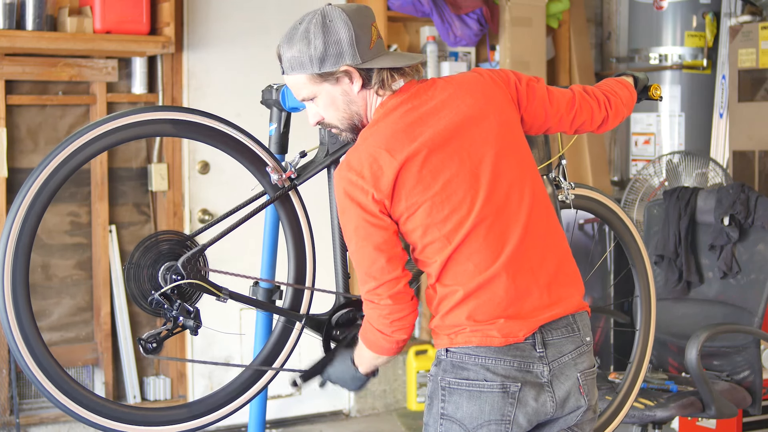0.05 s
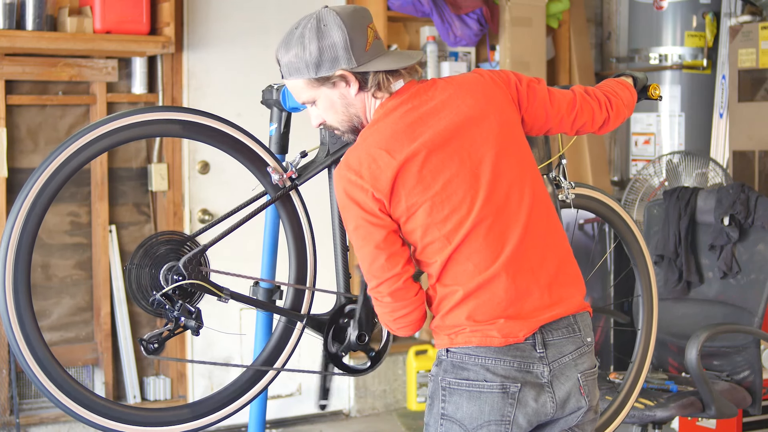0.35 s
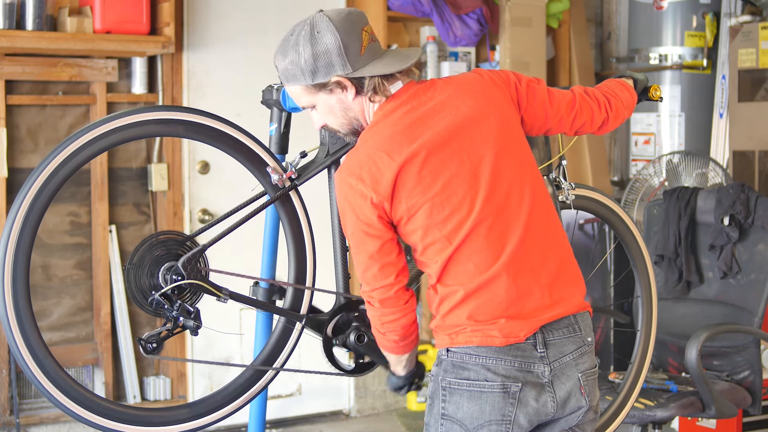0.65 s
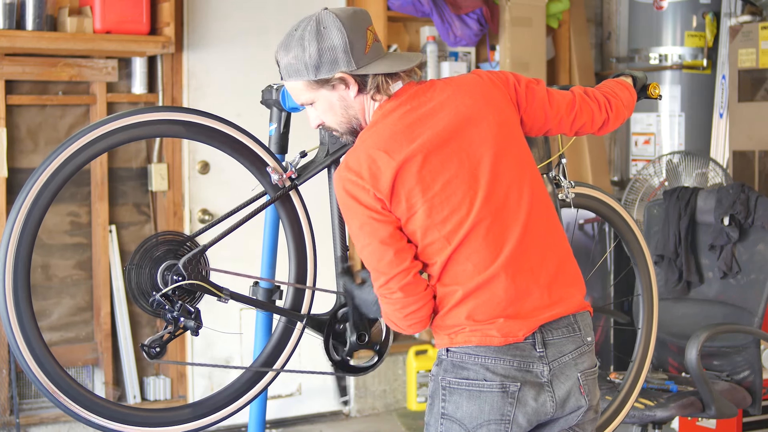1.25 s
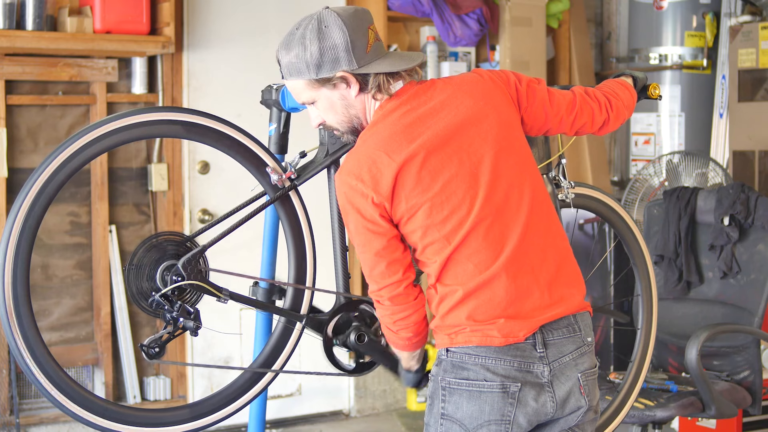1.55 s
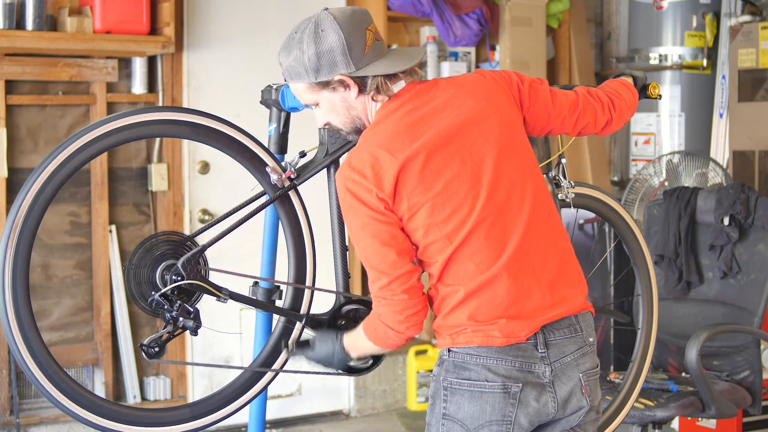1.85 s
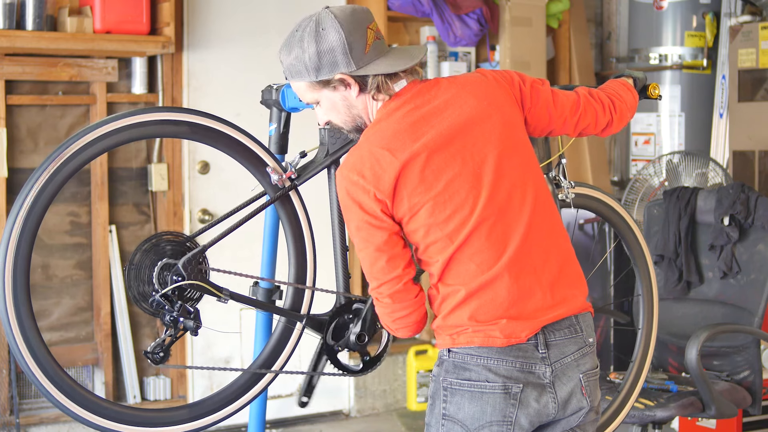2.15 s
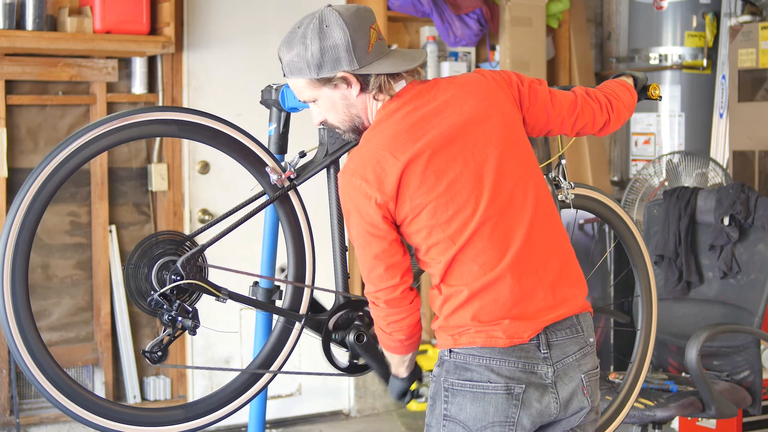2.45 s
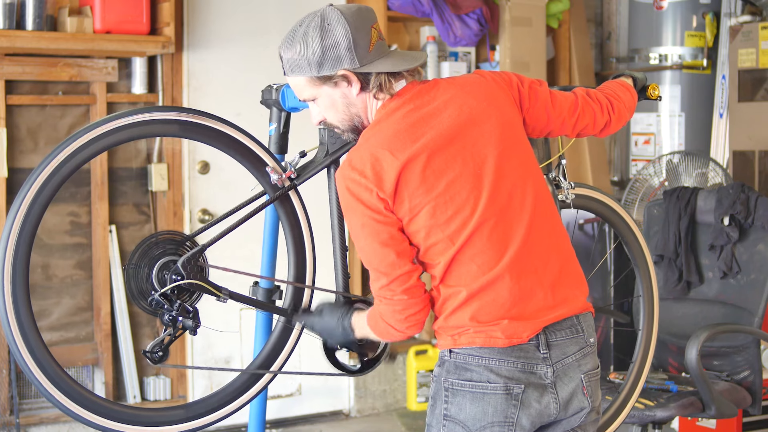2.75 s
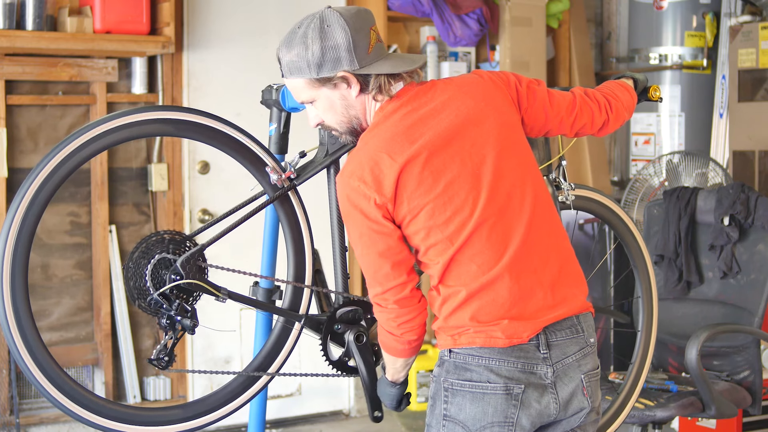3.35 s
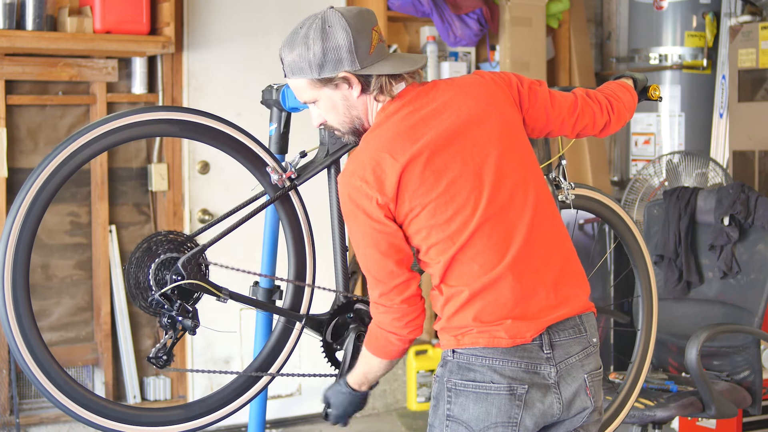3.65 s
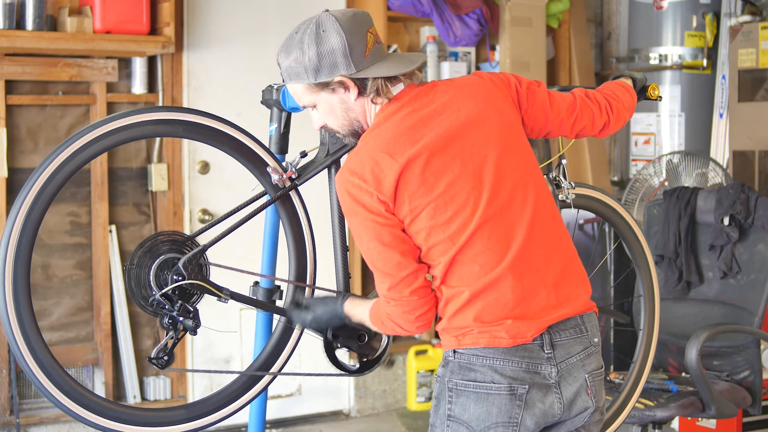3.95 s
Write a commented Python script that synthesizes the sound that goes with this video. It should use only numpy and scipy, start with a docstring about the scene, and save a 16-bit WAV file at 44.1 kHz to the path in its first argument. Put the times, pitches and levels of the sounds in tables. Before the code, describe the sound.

A hand-cranked bicycle chain whirs over its gears, with clacks and a ticking freehub.

```python
"""A bicycle chain purrs link by link over its sprockets, close to a stereo pair in a small workshop.
The bicycle hangs in a repair stand and its crank is turned by hand. The chain clacks through a gear
change, and whenever the hand lags behind the wheel the freehub pawls tick or buzz.
At the end the wheel coasts and something thumps. Behind it all lie room air and a faint hum."""
import sys
import numpy as np
from scipy import signal
from scipy.fft import rfft, irfft
from scipy.io import wavfile
from scipy.ndimage import uniform_filter1d

SR = 44100
rng = np.random.default_rng(int(sys.argv[2]) if len(sys.argv) > 2 else 0)


def master_out(mix):
    """Clip the mix to full scale and print it as 16-bit PCM to the path in sys.argv[1]."""
    frames = np.transpose(np.atleast_2d(mix))
    ceiling = np.clip(frames, -1, 1)
    pcm = np.round(ceiling * 32767).astype(np.int16)
    wavfile.write(sys.argv[1], SR, pcm)


N = 176400
TIME, FREQ = np.arange(N) / SR, np.fft.rfftfreq(2 * N, 1 / SR)
RISE_S = .0018  # attack of every blow and ring

# chain speed (t/s, link rate/Hz)
LINK_RATE = [(0, 48.2), (.8, 48.2), (1.4, 54), (2.6, 62), (3.1, 42), (3.35, 15), (4, 20)]
# loudness of the link clicks (t/s, level/dB)
CLICK_LEVEL = [(0, -39), (.8, -38.5), (1.7, -39), (2.66, -37.5), (3.15, -36.5)]
# spectrum of a link click (f/Hz, level/dB)
CLICK_COLOUR = [(300, -40), (1800, -6), (2700, -4.5), (5200, 1), (7500, -2), (9300, 6.5), (10500, 1),
                (12500, -1), (14000, -6.5), (16000, -12)]
# resonances of the frame (f/Hz, width/Hz, level over the colour/dB)
FRAME_MODES = [(236, 14, 1), (370, 11, 4), (461, 69, 0.5), (555, 12, -2), (656, 22, 2), (839, 42, 5.5)]


def chain(jitter_s=.0018, spread_db=8.5, rubbing=.53):
    """Links seat on the teeth. Returns their bright clicks, and the frame's rumble and hollow drone."""
    # loudness of the rumble and of the drone (t/s, level/dB)
    rumble_level = [(0, -49.5), (.55, -49), (.9, -46), (3, -47.5), (3.2, -40), (3.36, -48.5), (3.58, -53.5),
                    (3.63, -42.5), (4, -44)]
    drone_level = [(.2, -56.5), (.45, -52), (1.6, -60.5), (3.4, -57.5)]
    # their spectra (f/Hz, level/dB)
    rumble_colour = [(35, -18), (100, -6), (200, -16.5), (240, 0), (400, -4.5), (830, 1), (980, -8),
                     (1250, -0.5), (1520, 4), (1800, -12), (2700, 4.5), (5000, -9.5), (16000, -46)]
    drone_colour = [(180, -37), (330, -3.5), (470, 0), (800, -34.5)]
    times = teeth(LINK_RATE)
    late, size = rng.uniform(-1, 1, (len(times), 2)).T
    times = times + jitter_s * late
    db = spread_db * size - 1.5 * (np.arange(len(times)) % 2)  # every second link is softer
    seating = blows(times, db, decay_s=.0047) + rubbing
    shaking = blows(times, db, decay_s=.022)
    rumble = body(contact(shaking / shaking.mean()), rumble_colour, FRAME_MODES) * fader(rumble_level)
    clicks = body(contact(seating / seating.mean()), CLICK_COLOUR) * fader(CLICK_LEVEL)
    drone = body(contact(shaking / shaking.mean()), drone_colour, FRAME_MODES) * fader(drone_level)
    return clicks, rumble + drone


def freehub(spread_db=2, jitter_s=.00083, second_lag_s=.0074, second_db=-6.5):
    """Two pawls snap over the ratchet, not quite together, and ring the hub; fast clicks buzz."""
    # ratchet speed, a curve for each lag of the hand and one for the coast (t/s, click rate/Hz)
    slips = [
        [(1.002, 30.8), (1.07, 86.8), (1.17, 103.7), (1.24, 54.5), (1.275, 22.9), (1.39, 27.2)],
        [(2.072, 39.5), (2.16, 107.2), (2.26, 118.0), (2.38, 79.8), (2.45, 37.9), (2.55, 12.0)],
        [(2.706, 20.3), (2.79, 40.6), (2.99, 43.0), (3.08, 26.6), (3.2, 24.3)],
    ]
    coast = [(3.21, 85.6), (3.27, 112), (3.4, 188), (3.68, 207.7), (3.88, 124), (4, 105.5)]
    # strength of the snaps (t/s, level/dB)
    pawl_level = [(1, -23.5), (1.3, -23), (1.36, -31.5), (2.07, -26), (2.26, -22), (2.95, -24), (3.16, -23),
                  (3.5, -21), (4, -23)]
    # spectrum of a snap (f/Hz, level/dB)
    pawl_colour = [(300, -41), (1200, -30.5), (2500, -14), (4000, -7), (8800, -0.5), (11000, -4),
                   (13000, -8.5), (14200, -15.5)]
    # resonances of the hub (f/Hz, width/Hz, level over the colour/dB)
    hub_modes = [(1523, 16, 18), (5460, 340, 4), (6270, 300, 3.5), (8970, 410, 9)]
    times = np.concatenate([teeth(slip) for slip in slips + [coast]])
    late, size, lag = rng.uniform(-1.4, 1, (SR, 3))[:len(times)].T
    db = np.interp(times, *np.transpose(pawl_level)) + spread_db * size
    times = times + jitter_s * late
    first = blows(times, db, decay_s=.0049)
    second = blows(times + second_lag_s * abs(lag), db + second_db, decay_s=.0049)
    snaps = body(contact(first + second), pawl_colour, hub_modes)
    return snaps + chimes(times, db - 11.5, low_hz=8360, high_hz=9650, decay_s=.0051, partials=4)


def clacks(clang_stretch=1.18):
    """The chain slaps the cogs: a sharp top and a slightly longer clang."""
    # chain slaps (t/s, top level/dB, clang level/dB, power decay of the top/s)
    slaps = [(.883, -15.5, -30, 0.0057), (.888, -10.5, -37, 0.0039), (0.902, -17.5, -27, 0.011),
             (.964, -18, -27.5, 0.012), (0.971, -23, -26, 0.0038), (1.518, -27.5, -40, 0.0077),
             (1.977, -27.5, -35, 0.0053), (2.138, -24.5, -34, 0.0095), (2.241, -20.5, -32, .011),
             (3.195, -22.5, -28, 0.0057), (3.73, -20, -28, 0.013)]
    # spectra of the top and the clang (f/Hz, level/dB)
    top_colour = [(500, -65), (2500, -11), (7500, -4.5), (9500, 1.5), (14000, -13.5), (16000, -21)]
    clang_colour = [(150, -52), (400, 0.5), (1700, 6), (4000, -1.5), (7000, 4.5), (16000, -4)]
    top = sum(blows(s, db, decay) for s, db, _, decay in slaps)
    clang = sum(blows(s, db, clang_stretch * decay) for s, _, db, decay in slaps)
    return body(contact(top), top_colour) + body(contact(clang), clang_colour)


def pings(width_hz=650):
    """Single links and cogs ring out when struck, each in a narrow band around one pitch."""
    # struck links and cogs (t/s, f/Hz, level/dB)
    strikes = [(0.436, 9100, -32.5), (0.975, 2510, -21), (1.887, 12050, -33), (1.977, 9250, -32),
               (2.246, 10000, -22), (2.251, 3250, -26.5), (3.197, 9540, -18), (3.199, 10500, -27),
               (3.198, 3260, -24.5)]
    out = np.zeros((2, N))
    for s, hz, db in strikes:
        pole = np.exp((2j * np.pi * hz - np.pi * width_hz) / SR)
        ring = signal.lfilter([1], np.poly([pole, pole]), rng.standard_normal((2, N))).real
        envelope = np.sqrt(np.maximum(blows(s, db, decay_s=.0053), 0))
        out += ring / ring.std() * envelope
    return out


def side_plates(tinkle_db=-1, spread_db=10, ring_db=3, click_db=-3):
    """Loose side plates tinkle as they seat; now and then a link lands hard, with a click."""
    # links that land hard (t/s, level/dB)
    hard_links = [(.042, -31.5), (.189, -30.5), (.272, -41), (.313, -31.5), (.437, -28.5), (.583, -33),
                  (.685, -39), (.727, -30), (0.797, -30), (.851, -27), (1.611, -30), (1.701, -29.5),
                  (1.792, -30), (1.886, -26), (2.49, -25.5), (3.108, -26)]
    hard_s, hard_db = np.transpose(hard_links)
    times = teeth(LINK_RATE)
    db = np.interp(times, *np.transpose(CLICK_LEVEL)) + tinkle_db
    db += spread_db * rng.uniform(-1, 1, len(times))
    times, db = np.append(times, hard_s), np.append(db, hard_db + ring_db)
    tinkle = chimes(times, db, low_hz=8000, high_hz=14140, decay_s=.005, partials=18)
    landings = blows(hard_s, hard_db + click_db, decay_s=.0053)
    return tinkle + body(contact(landings), CLICK_COLOUR)


def knocks():
    """The frame jolts in its stand and knocks dully."""
    # jolts (t/s, level/dB)
    jolts = [(.005, -39.5), (.313, -44), (0.585, -40), (0.881, -29), (.927, -33), (.973, -32.5),
             (1.012, -37), (1.173, -36), (2.139, -35.5), (2.348, -39.5), (3.197, -41.5)]
    # spectrum of a knock (f/Hz, level/dB)
    knock_colour = [(100, -47), (200, -3), (370, 0.5), (700, 2), (1050, -8.5), (4000, -3), (16000, -47)]
    return body(contact(blows(*np.transpose(jolts), decay_s=.018)), knock_colour, FRAME_MODES)


def thump():
    """One heavy, hollow blow rings the frame."""
    # spectrum of the blow (f/Hz, level/dB)
    thump_colour = [(50, -57), (165, -21), (215, 0), (290, 1), (400, 5), (650, -4.5), (1000, -11),
                    (1450, -4.5), (2500, -13), (16000, -40)]
    return body(contact(blows(times=3.731, db=-23.5, decay_s=.015)), thump_colour, FRAME_MODES)


def room_tone(air_db=-53, hum_hz=119.3, hum_db=-63):
    """Still workshop air and a faint hum."""
    # spectrum of the air (f/Hz, level/dB)
    air_colour = [(25, -30), (62, -3), (120, 4), (180, 1.5), (260, 5), (450, -12), (1000, -3),
                  (16000, -24.5)]
    air = body(rng.standard_normal((2, N)), air_colour)
    hum = np.sqrt(2) * np.sin(2 * np.pi * hum_hz * TIME)
    return amp(air_db) * air + amp(hum_db) * hum


def workshop(x, wet_db, count=3):
    """Adds the room's short, dense reverberation; tails take turns so it stays free of ringing tones."""
    # reverberation time (f/Hz, T60/s)
    t60 = [(400, 0.5), (5000, .45), (9000, 0.18)]
    taps = rng.standard_normal((count, 2, SR // 2)) * (TIME[:SR // 2] > .004)  # 4 ms pre-delay
    hz, t, spectra = signal.stft(taps, SR, nperseg=256)
    decay = amp(-60 * t / at_hz(t60, hz)[:, None])
    tails = signal.istft(spectra * decay, SR, nperseg=256)[1]
    wet = np.zeros((2, N))
    for k, tail in enumerate(tails):
        feed = np.sqrt(2 / count) * np.cos(2 * np.pi * TIME + np.pi * k / count)
        wet += signal.fftconvolve(x * feed, tail / np.linalg.norm(tail[0]), axes=1)[:, :N]
    return (x + amp(wet_db) * wet) / np.sqrt(1 + amp(wet_db) ** 2)


def amp(db):
    """Decibels to gain."""
    return 10 ** (np.asarray(db) / 20)


def fader(levels):
    """Gain at every sample, from points (t/s, level/dB)."""
    return amp(np.interp(TIME, *np.transpose(levels)))


def at_hz(points, hz):
    """Interpolates a table on a log-frequency axis."""
    f, value = np.transpose(points)
    return np.interp(np.log(hz + 1), np.log(f), value)


def through(x, response):
    """Applies a frequency response."""
    return irfft(rfft(x, 2 * N) * response)[..., :N]


def body(x, colour, modes=()):
    """Causal filter of unit power: a broad colour with resonances on top."""
    peaks = sum(amp(2 * db) / (1 + (2 * (FREQ - hz) / width) ** 2) for hz, width, db in modes)
    gain = amp(at_hz(colour, FREQ)) * np.sqrt(1 + peaks)
    log_gain = np.log(gain / np.sqrt(np.mean(gain ** 2)))
    mirrored = np.concatenate([log_gain, log_gain[-2:0:-1]])
    minimum_phase = np.exp(np.conj(signal.hilbert(mirrored)))[:N + 1]
    return through(x, minimum_phase)


def contact(power, grit_db=2.1):
    """Gritty metal-on-metal noise that follows a power envelope, in mid and side."""
    grit = uniform_filter1d(rng.standard_normal(N), size=24)
    grit = amp(grit_db * grit / grit.std())
    return rng.standard_normal((2, N)) * grit * np.sqrt(np.maximum(power, 0) / np.mean(grit ** 2))


def blows(times, db, decay_s):
    """Power envelope of blows that rise fast and die away."""
    hits, t = np.zeros(N), TIME[:SR // 4]
    starts = np.round(np.atleast_1d(times) * SR).astype(int)
    np.add.at(hits, np.clip(starts, 0, N - 1), amp(db) ** 2)
    envelope = (1 - np.exp(-t / RISE_S)) ** 2 * np.exp(-t / decay_s)
    return signal.oaconvolve(hits, envelope)[:N]


def chimes(times, db, low_hz, high_hz, decay_s, partials):
    """Small steel parts ring, every one with partials of its own."""
    out, t = np.zeros((2, N + SR)), TIME[:SR // 20]
    envelope = (1 - np.exp(-t / RISE_S)) * np.exp(-t / decay_s)
    for s, gain in zip(times, amp(db)):
        pitch, size, mid_phase, side_phase = rng.random((4, partials, 1))
        hz = low_hz + (high_hz - low_hz) * pitch
        sines = np.sin(2 * np.pi * (hz * t + np.array([mid_phase, side_phase])))
        ring = (size * sines).sum(1) / np.linalg.norm(size)
        start = round(s * SR)
        out[:, start:start + len(t)] += gain * ring * envelope
    return out[:, :N]


def teeth(rate):
    """Moments at which a tooth passes, from a curve of teeth per second."""
    s, per_s = np.transpose(rate)
    t = np.arange(s[0], s[-1], 1 / SR)
    passed = np.cumsum(np.interp(t, s, per_s)) / SR
    return np.interp(np.arange(int(passed[-1]) + 1), passed, t)


def stereo_pair(mid, side, left_lag_s=.00014):
    """At the microphones the bass is nearly mono, the midrange wide and later on the left."""
    # stereo width (f/Hz, side minus mid level/dB)
    spread = [(30, -5), (80, -20), (320, -38), (600, -16), (1100, -0.5), (5000, -1.5), (9000, -4.5),
              (15000, -8)]
    # balance (f/Hz, left minus right level/dB)
    balance = [(200, 0.1), (750, 2.5), (1400, -1.5), (3000, -2), (9200, 1.4), (12000, -.9)]
    width, tilt = amp(at_hz(spread, FREQ)), amp(at_hz(balance, FREQ) / 2)
    lag = np.exp(-2j * np.pi * np.minimum(FREQ * left_lag_s, 1))
    mid = through(mid, 1 / np.hypot(1, width))
    side = through(side, width / np.hypot(1, width))
    return np.array([through(mid + side, tilt * lag), through(mid - side, 1 / tilt)])


def scene():
    """The bicycle in the workshop: the ringing steel sounds closest, the thump has the most room."""
    clicks, rumble = chain()
    drivetrain = workshop(clicks + clacks() + freehub(), wet_db=-5)
    ringing = workshop(pings() + side_plates(), wet_db=-10)
    frame = workshop(rumble + knocks(), wet_db=-6.5)
    blow = workshop(thump(), wet_db=-3)
    mid, side = drivetrain + ringing + frame + blow + room_tone()
    return stereo_pair(mid, side)


def record(dry, notch_hz=8050, half_width_hz=79, edge_hz=15750):
    """A narrow notch in the treble, then the band limit."""
    offset_hz = FREQ - notch_hz
    notched = through(dry, abs(offset_hz) / np.hypot(offset_hz, half_width_hz))
    lowpass = signal.firwin(511, edge_hz, window=("kaiser", 9), fs=SR)
    return signal.oaconvolve(notched, lowpass[None], "same")


dry = scene()
out = record(dry)
master_out(out)
```